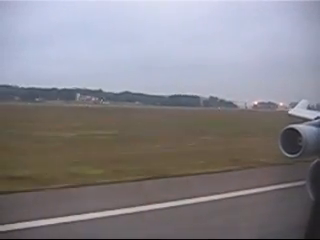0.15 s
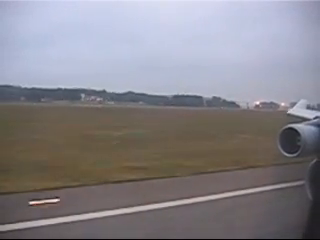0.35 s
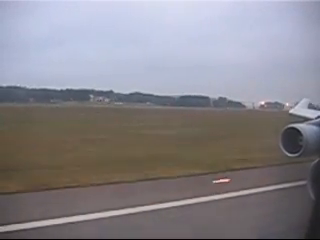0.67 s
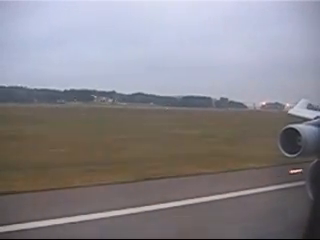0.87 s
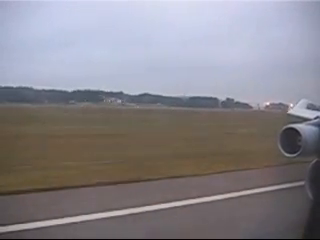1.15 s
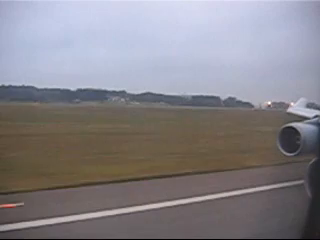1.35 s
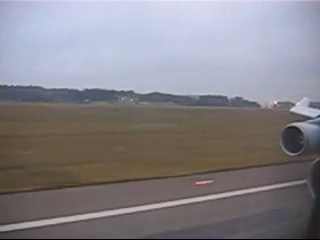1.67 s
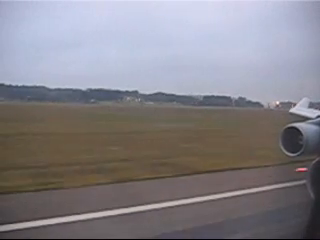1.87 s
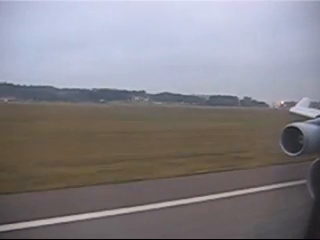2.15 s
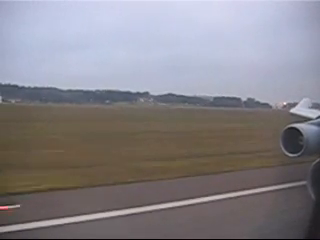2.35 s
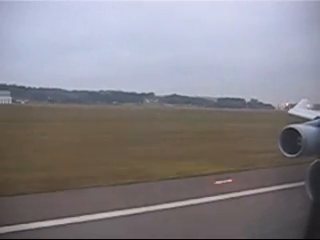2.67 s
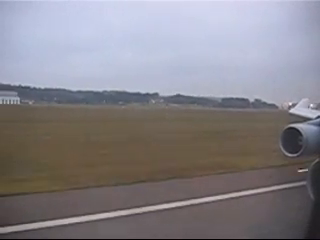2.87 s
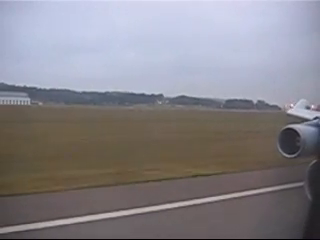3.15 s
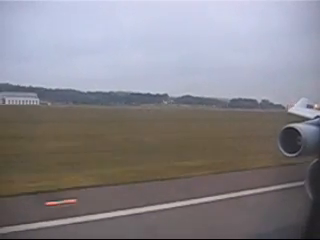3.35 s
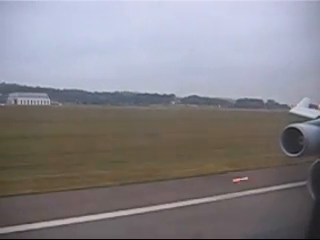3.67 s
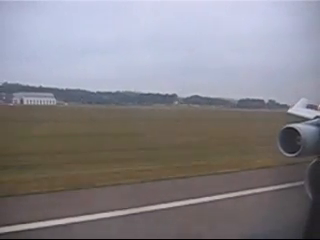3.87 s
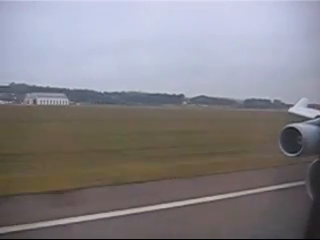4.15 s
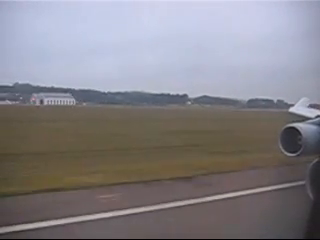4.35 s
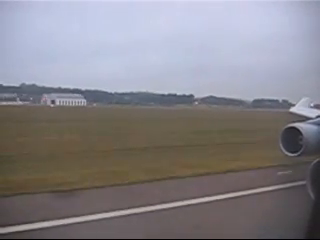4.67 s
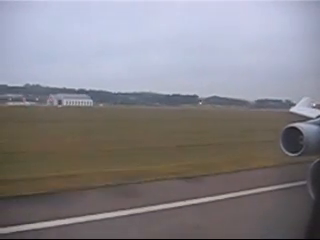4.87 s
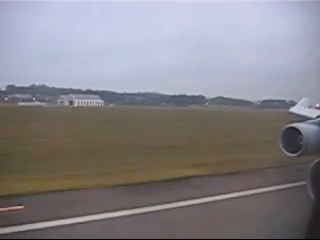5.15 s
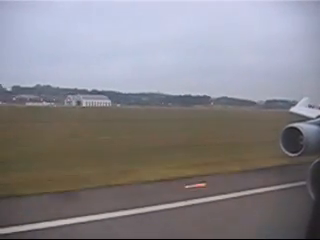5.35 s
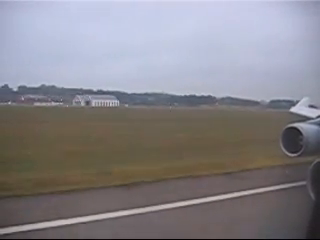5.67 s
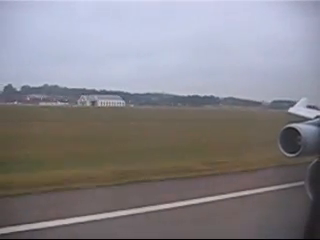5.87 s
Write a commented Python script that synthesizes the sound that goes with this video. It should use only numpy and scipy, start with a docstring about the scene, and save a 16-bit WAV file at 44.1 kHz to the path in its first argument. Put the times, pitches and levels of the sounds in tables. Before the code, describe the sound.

Inside an airliner on its takeoff roll: a loud steady roar, a wavering fan whine and buzz, and low booms from the runway.

```python
"""Wheels rumbling down the runway under a four-engined jet at takeoff thrust, taken from a window seat.
Uneven stretches make the cabin boom all around the microphone. From outside, through the wall,
come the roar of the exhaust and the whine and buzz-saw tones of the fans.
The microphone is a small camera's: the camera ducks and rounds off the loudest swings, adds hiss
and holds each sample, which mirrors the sound into the treble."""
import sys
import numpy as np
from scipy import signal
from scipy.fft import rfft, irfft
from scipy.io import wavfile
from scipy.ndimage import uniform_filter1d

SR = 44100
rng = np.random.default_rng(int(sys.argv[2]) if len(sys.argv) > 2 else 0)


def waveform_to_disk(signal):
    """Save audio, clipped to [-1, 1], as 16-bit WAV at the path in sys.argv[1]."""
    frames = np.transpose(np.atleast_2d(signal))
    scaled = np.clip(frames, -1, 1) * 32767
    samples = np.round(scaled).astype(np.int16)
    wavfile.write(sys.argv[1], SR, samples)


N = 265029
TIME = np.arange(N) / SR

# blade-passing whine as it reaches the seat: t/s, level/dB
WHINE_LEVEL = [(0, -37), (0.2, -40.5), (0.5, -34.5), (0.7, -42.5), (0.93, -35), (1.62, -44), (1.79, -36),
               (2.48, -44), (2.75, -53.5), (3.08, -38.5), (3.48, -49.5), (4.25, -51), (4.72, -45),
               (4.97, -41.5), (5.22, -48), (5.6, -54), (5.89, -46.5), (6.01, -46)]
# the whine's octave: t/s, level/dB
OCTAVE_LEVEL = [(0, -64), (1.6, -57), (2.4, -55), (2.9, -49.5), (3.35, -62), (3.65, -54), (4.5, -61),
                (6.01, -57)]
# the fans' low drone: t/s, level/dB
DRONE_LEVEL = [(0, -40), (0.7, -48), (1.12, -32), (1.6, -33), (1.95, -39), (2.3, -30), (4.2, -30.5),
               (4.4, -37), (6.01, -34.5)]
# buzz-saw tones of the unequal fan blades: multiple of the shaft rate, level/dB
BUZZ_ORDERS = [(6, -32.5), (8, -41.5), (12, -47.5), (17, -62), (18, -48.5), (19, -56), (20, -52.5),
               (22, -58), (29, -61), (37, -61), (42, -60), (43, -94), (45, -64), (46, -86), (47, -106),
               (50, -66.5), (70, -62.5)]

# exhaust on the cabin side of the wall: t/s, level/dB
ROAR_LEVEL = [(0, -33.5), (0.22, -34), (0.42, -30), (0.7, -33), (1.05, -30), (1.35, -30.5), (1.9, -27),
              (2.3, -30.5), (2.7, -29.5), (3.06, -27.5), (3.44, -33), (3.9, -28), (4.35, -33), (4.6, -29.5),
              (4.8, -32.5), (5.52, -32.5), (5.8, -32.5), (6.01, -31.5)]
# the exhaust's low end: f/Hz, relative density/dB
THROB_SPECTRUM = [(170, -17), (220, -4.5), (255, -1), (285, -8), (305, -8), (325, -6), (345, -11),
                  (400, -15.5), (440, -18), (900, -55)]
# its midrange: f/Hz, relative density/dB
ROAR_SPECTRUM = [(150, -8.5), (400, -7), (540, 2), (620, -1), (690, -4.5), (800, -4), (900, -5.5),
                 (1020, -9.5), (1300, -16.5), (1900, -17.5), (2350, -25), (4000, -46)]
# its high end: f/Hz, relative density/dB
RUSH_SPECTRUM = [(900, -19), (1900, -3), (2400, 4.5), (2800, 3), (3400, 3.5), (3800, -3), (4500, 0),
                 (5500, -1.5)]
# the low throb swells: t/s, length/s, gain/dB
THROB_SWELLS = [(0.46, 0.2, 3), (2.1, 0.22, 1.5), (4.05, .2, 1.5), (4.6, 0.12, 4)]

# the airframe shaking around the seat: f/Hz, relative density/dB
SHUDDER_SPECTRUM = [(8, -28), (15, -25), (25, -12), (36, 6), (46, 7), (60, -17), (100, -52)]
# its shudder swells or eases: t/s, length/s, gain/dB
SHUDDER_SWELLS = [(0.18, 0.11, 10), (0.48, 0.27, -3), (2.03, 0.12, 7), (3.2, 0.37, 2), (3.95, .4, 3.5),
                  (4.55, 0.28, 1), (5.2, 0.28, 4)]
# uneven stretches of runway make the cabin boom: t/s, length/s, gain/dB
BOOM_SWELLS = [(0.6, 0.37, 9.5), (1.43, 0.98, 6), (2.97, 0.34, 11.5), (3.22, 0.4, 6), (3.9, 0.19, 7.5),
               (4.14, 0.13, 6.5), (4.68, 0.39, 10), (5.13, 0.067, 7)]
# wheel rumble from below the floor: f/Hz, relative density/dB
RUMBLE_SPECTRUM = [(40, -5.5), (70, -2.5), (90, 4.5), (110, -1.5), (125, 0.5), (145, 1), (172, -6),
                   (195, -5.5), (215, -7.5), (300, -47)]
# coarse patches of runway swell the rumble: t/s, length/s, gain/dB
COARSE_PATCHES = [(0.08, 0.099, 3), (0.42, 0.11, 5), (1.1, 0.28, 2), (1.8, 0.21, 3.5), (2.28, 0.19, 1),
                  (2.51, 0.091, 3), (3.77, 0.35, 2), (5.48, 0.14, 5), (5.92, 0.095, 3)]
# tyre hum grows with ground speed, then fades: t/s, level/dB against the broad rumble
TYRE_HUM_LEVEL = [(0, -10), (1.5, -10), (2.5, -9), (3.7, -2), (4.8, -2.5), (6.01, -10)]

# in lulls of the bass the camera's gain creeps up, lifting roar and whine, then ducks abruptly:
# crest t/s, rise/s, gain/dB
GAIN_RECOVERIES = [(0.06, 0.083, 0.5), (0.2, 0.047, 3.5), (0.53, 0.073, 1), (0.93, 0.058, 2.5),
                   (1.19, 0.079, 3.5), (1.59, 0.11, 0.5), (1.83, 0.16, 1.3), (3.15, 0.18, 3.5),
                   (3.33, 0.13, 1.5), (3.62, 0.13, 3.5), (3.85, 0.096, 2.5), (4.32, 0.09, 3),
                   (4.49, 0.047, 0), (4.79, 0.14, 2.5), (5.01, 0.11, 3), (5.45, 0.094, 3.5),
                   (5.909, 0.12, 5.8)]
# the camera's own hiss: f/Hz, relative density/dB
HISS_SPECTRUM = [(1000, -32), (3000, -14), (4500, -1), (5500, 6)]


def from_db(db):
    """Decibels to gain."""
    return 10 ** (np.asarray(db) / 20)


def unit_rms(x):
    """Scale to unit power."""
    return x / np.sqrt(np.mean(x ** 2) + 1e-20)


def curve(rows):
    """A level curve at every sample."""
    times, levels_db = np.transpose(rows)
    return np.interp(TIME, times, levels_db)


def swells(rows):
    """Rounded swells in dB, each centred on its time."""
    return sum(db * np.cos(np.pi * np.clip((TIME - centre_s) / length_s, -0.5, 0.5))
               for centre_s, length_s, db in rows)


def drift(rate_hz):
    """A slow random wander of spread 1, changing about rate_hz times a second."""
    step, run_in = 40, 2000  # samples per point; points for the filter to settle
    pole = np.exp(-2 * np.pi * rate_hz * step / SR)
    white = rng.standard_normal(N // step + run_in + 2)
    slow = signal.lfilter([1], [1, -2 * pole, pole * pole], white)[run_in:]
    return np.interp(np.arange(N) / step, np.arange(len(slow)), unit_rms(slow))


def noise(spectrum):
    """Noise with the given spectrum; rms 1."""
    hz, db = np.transpose(spectrum)
    bins_hz = np.maximum(np.fft.rfftfreq(N, 1 / SR), 1)
    gain = from_db(np.interp(np.log(bins_hz), np.log(hz), db))
    return unit_rms(irfft(rfft(rng.standard_normal(N)) * gain, N))


def resonance(hz, width_hz):
    """A mode shaken at random, with steep skirts; rms 1."""
    band = signal.butter(2, [hz - width_hz / 2, hz + width_hz / 2], "band", fs=SR, output="sos")
    return unit_rms(signal.sosfilt(band, rng.standard_normal(N + SR))[SR:])


def steady(x, span_s):
    """Even out swells slower than the span, keeping the fast grain."""
    return x / np.sqrt(uniform_filter1d(x ** 2, max(int(span_s * SR), 1)) + 1e-9)


def gain_recoveries(duck_s=0.021, dip_share=0.58, return_s=0.094):
    """The camera's gain in dB: it creeps up to each listed crest, ducks into a dip and returns."""
    return sum(db * np.interp(TIME - crest_s, [-rise_s, 0, duck_s, duck_s + return_s],
                              [0, 1, -dip_share, 0])
               for crest_s, rise_s, db in GAIN_RECOVERIES)


def fan_tone(hz, scatter, rate_hz):
    """A direct tone plus a part scattered by turbulent air on its way to the seat; rms 1."""
    path = 1 + scatter * (drift(rate_hz) + 1j * drift(rate_hz))
    return unit_rms(np.real(path * np.exp(2j * np.pi * (hz * TIME + rng.random()))))


def fans(shaft_hz=52.02, blades=38, drone_order=9):
    """Out on the wings: blade-passing whine, a drone and the buzz of shock waves repeating once a turn."""
    whine_db = curve(WHINE_LEVEL) + 0.61 * drift(23)
    whine = from_db(whine_db) * fan_tone(blades * shaft_hz, scatter=0.19, rate_hz=26)
    octave = from_db(curve(OCTAVE_LEVEL)) * fan_tone(2 * blades * shaft_hz, scatter=0.44, rate_hz=19)
    drone = from_db(curve(DRONE_LEVEL)) * fan_tone(drone_order * shaft_hz, scatter=0.13, rate_hz=14)
    listed_db = dict(BUZZ_ORDERS)
    buzz = np.zeros(N)
    for order in range(6, 2 * blades):
        # unlisted shaft orders are faint and fall with pitch
        level_db = listed_db.get(order, -60.5 - 7 * np.log2(order / drone_order))
        buzz += from_db(level_db) * fan_tone(order * shaft_hz, scatter=0.61, rate_hz=4)
    return whine + octave + drone + buzz


def exhaust(lift_db, rush_fade_db_per_s=0.1):
    """Jet noise through the wall: a low throb, a roar with a ringing panel, and a thin rush."""
    throb_db = 8 + swells(THROB_SWELLS) + lift_db + 0.98 * drift(8.3)
    throb = from_db(throb_db) * steady(noise(THROB_SPECTRUM), span_s=0.095)
    turbulence = noise(ROAR_SPECTRUM)
    panel = from_db(-8) * resonance(hz=750, width_hz=58)
    roar = from_db(lift_db) * steady(turbulence + panel, span_s=0.067)
    rush_db = -12.5 - rush_fade_db_per_s * TIME + 1.66 * lift_db
    rush = from_db(rush_db) * noise(RUSH_SPECTRUM)
    flutter = from_db(0.2 * drift(18))
    return from_db(curve(ROAR_LEVEL)) * (throb + flutter * (roar + rush))


def airframe_shudder():
    """The runway shakes the airframe around the seat, which rings at the bottom of the bass."""
    level_db = -25 + swells(SHUDDER_SWELLS) + 3.3 * drift(8.3)
    shaking = noise(SHUDDER_SPECTRUM) + resonance(hz=32.85, width_hz=5.4)
    return from_db(level_db) * steady(shaking, span_s=0.057)


def cabin_boom(fade_db_per_s=0.42):
    """A low cabin mode swells with each uneven stretch and thins out as the jet gathers speed."""
    level_db = -19 - fade_db_per_s * TIME + swells(BOOM_SWELLS) + 3.4 * drift(8.3)
    return from_db(level_db) * steady(resonance(hz=64.36, width_hz=9.9), span_s=0.064)


def wheel_rumble():
    """Below the floor the wheels rumble and the tyres hum, louder on coarse patches."""
    level_db = -15 + swells(COARSE_PATCHES) + 1.17 * drift(8.3)
    hum = from_db(curve(TYRE_HUM_LEVEL)) * resonance(hz=170.05, width_hz=23.6)
    return from_db(level_db) * steady(noise(RUMBLE_SPECTRUM) + hum, span_s=0.0767)


def scene():
    """At the window seat, in mono: in lulls of the bass the camera's gain lifts roar and whine."""
    lift_db = gain_recoveries()
    engines = from_db(0.97 * lift_db) * fans() + exhaust(lift_db)
    rolling = airframe_shudder() + cabin_boom() + wheel_rumble()
    bass_lulls = from_db(-0.31 * lift_db)
    return (engines + bass_lulls * rolling)[None]


def limiter(x, ceiling_db, recovery_db_per_s, attack_s):
    """Each swing over the ceiling quickly ducks the whole sound; the gain then creeps back."""
    excess_db = np.maximum(20 * np.log10(np.abs(x) + 1e-9) - ceiling_db, 0)
    recovery_db = recovery_db_per_s * TIME
    duck_db = np.maximum.accumulate(excess_db + recovery_db, axis=-1) - recovery_db
    pole = np.exp(-1 / (attack_s * SR))
    return x * from_db(-signal.lfilter([1 - pole], [1, -pole], duck_db))


def overload(x, limit, bias, knee):
    """An off-centre input stage that is linear until close to its limit."""
    drive = (x + bias) / limit
    return limit * drive / (1 + np.abs(drive) ** knee) ** (1 / knee)


def record(dry, dc_offset=0.025, microphone_top_hz=3830, hold_samples=4, cutoff_hz=12450):
    """The camera at the seat: ducked, rounded peaks, a dull, hissy input, held samples, a top cut."""
    ducked = limiter(dry * from_db(0.94), ceiling_db=-2.5, recovery_db_per_s=31.5, attack_s=0.0023)
    rounded = overload(ducked, limit=0.69, bias=0.061, knee=8) + dc_offset
    dull = signal.sosfilt(signal.butter(3, microphone_top_hz, fs=SR, output="sos"), rounded)
    hissy = dull + from_db(-41) * noise(HISS_SPECTRUM)
    sampled = signal.resample_poly(hissy, 1, hold_samples, axis=-1, padtype="edge")
    held = np.repeat(sampled, hold_samples, axis=-1)[:, :N]  # the steps mirror the sound into the treble
    return signal.sosfilt(signal.ellip(10, 0.2, 90, cutoff_hz, fs=SR, output="sos"), held)


dry = scene()
out = record(dry)
waveform_to_disk(out)
```